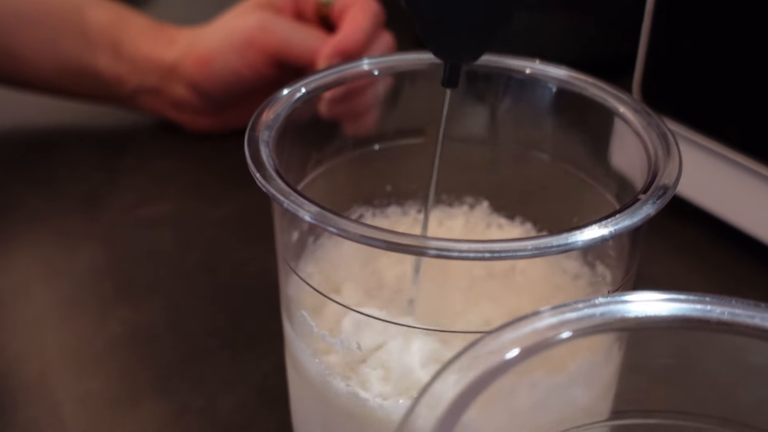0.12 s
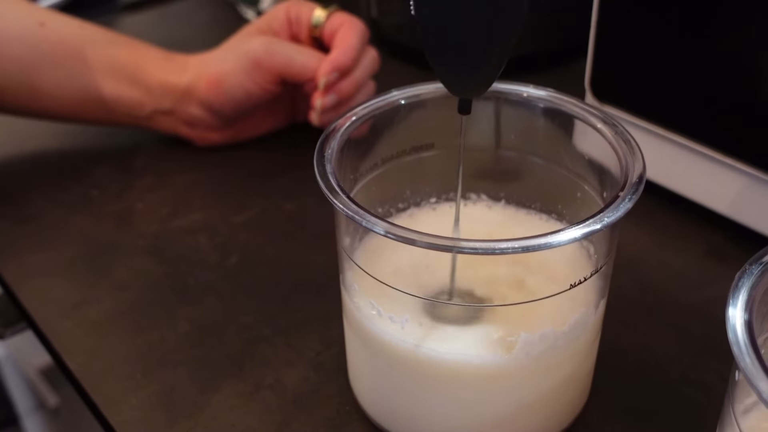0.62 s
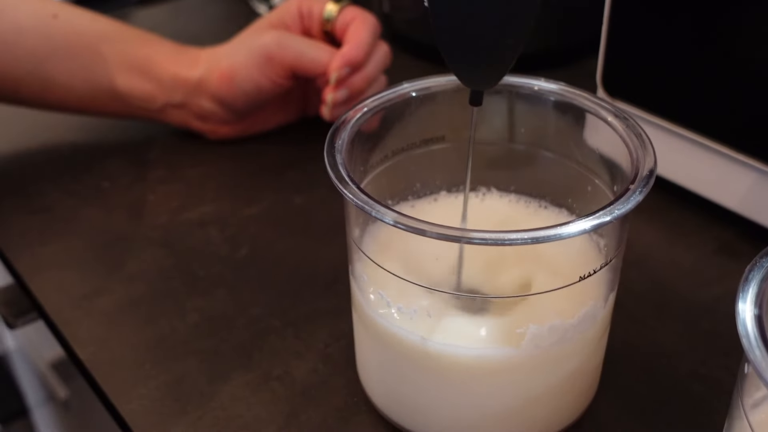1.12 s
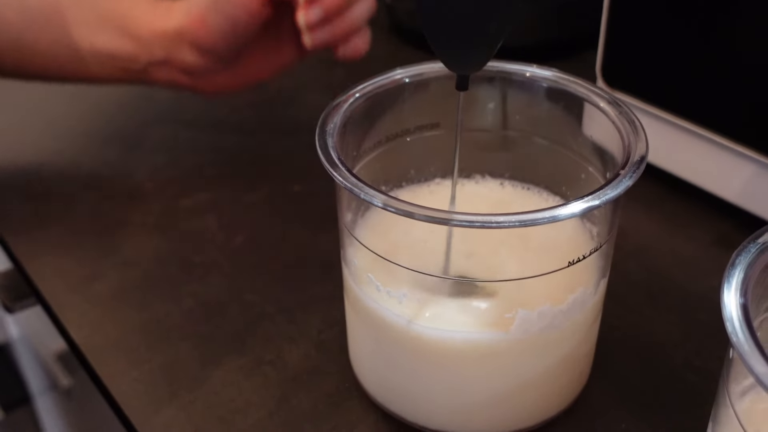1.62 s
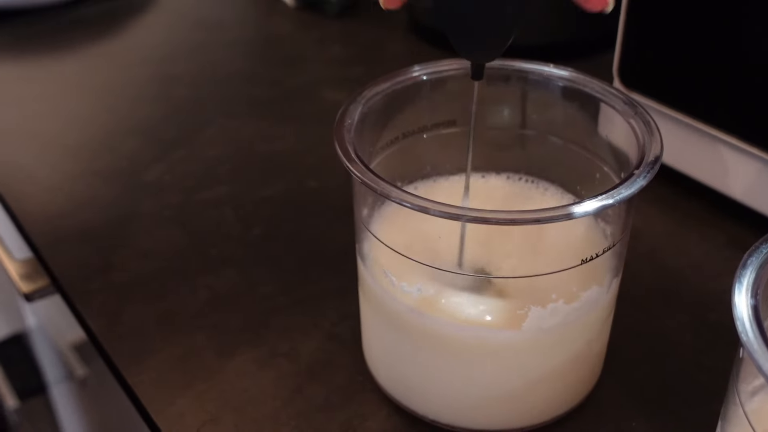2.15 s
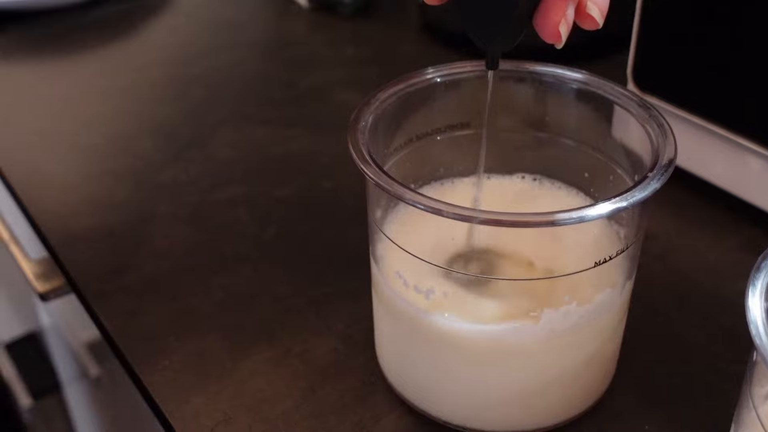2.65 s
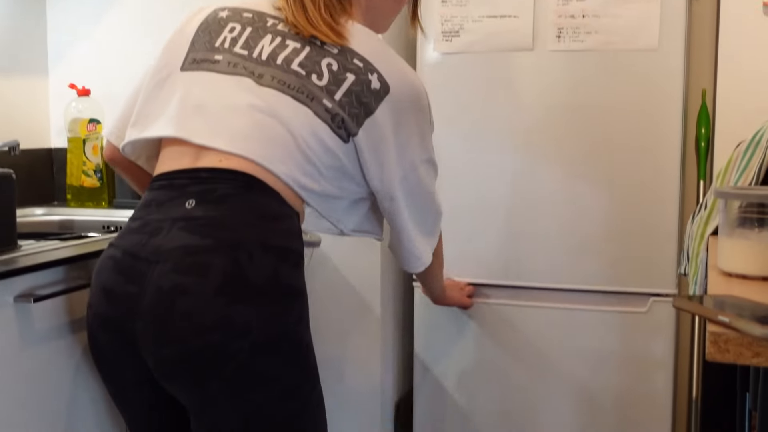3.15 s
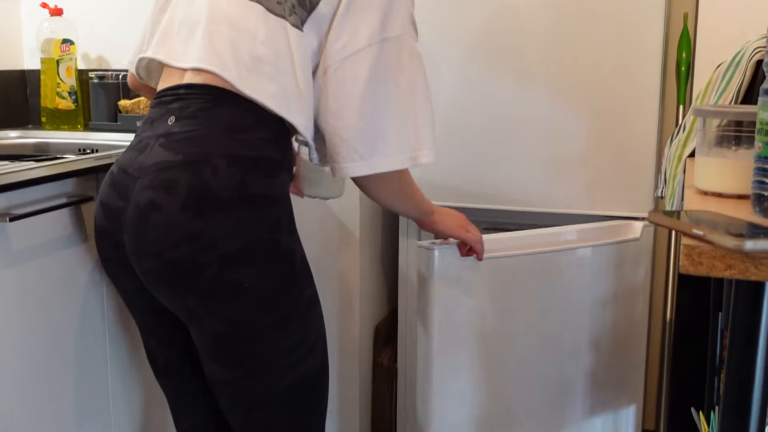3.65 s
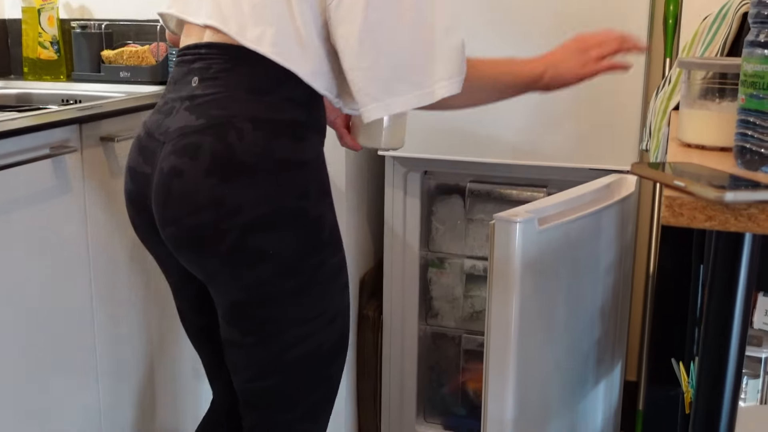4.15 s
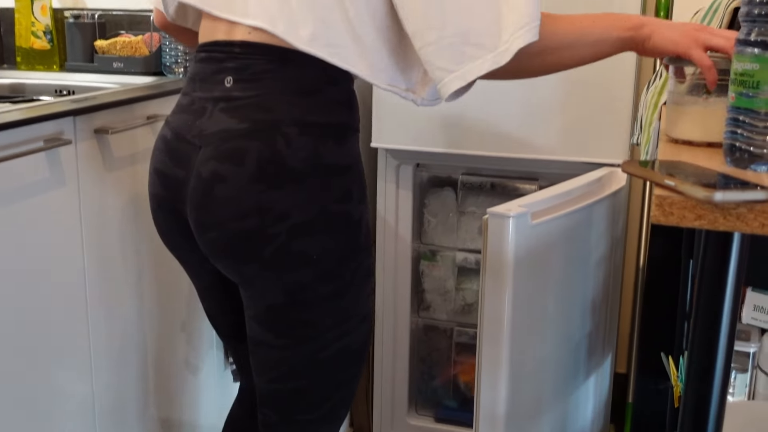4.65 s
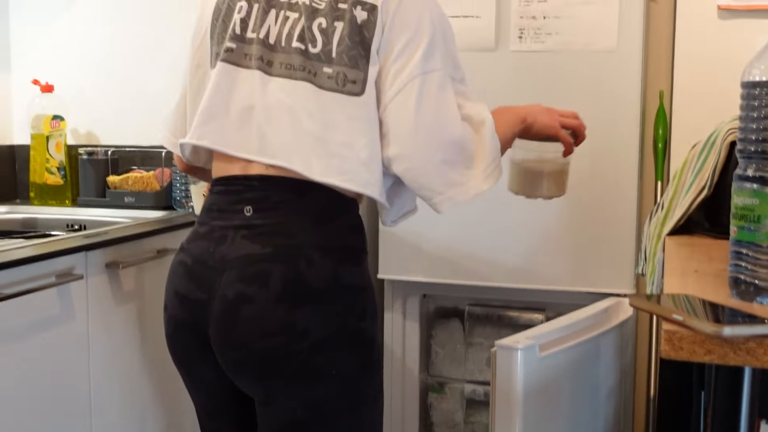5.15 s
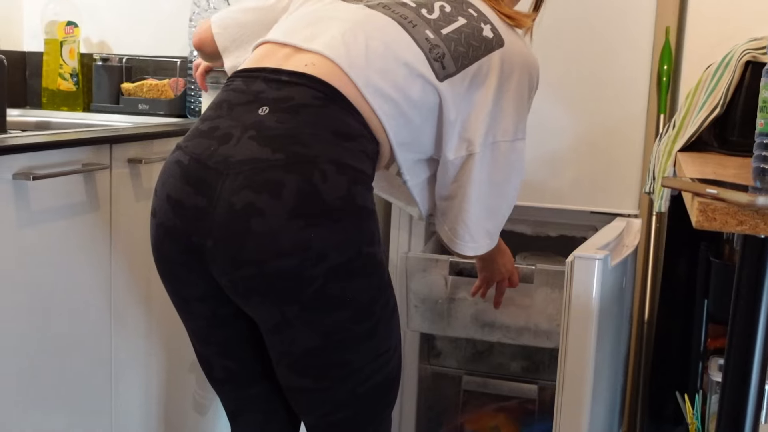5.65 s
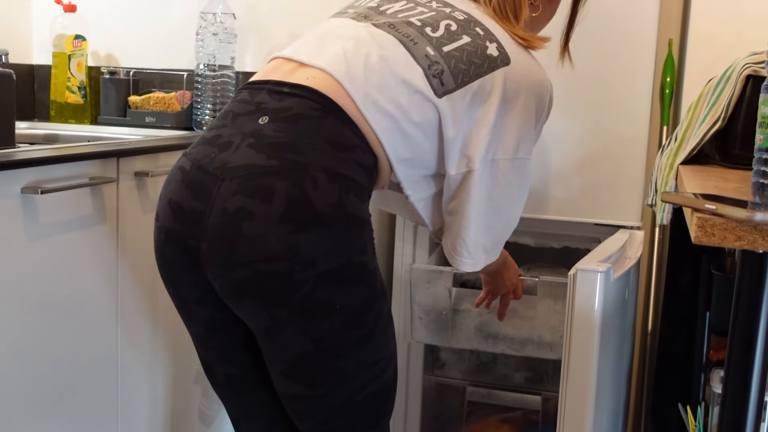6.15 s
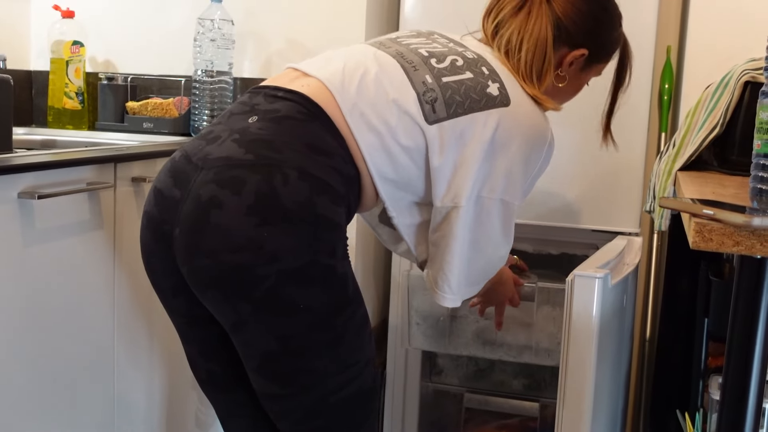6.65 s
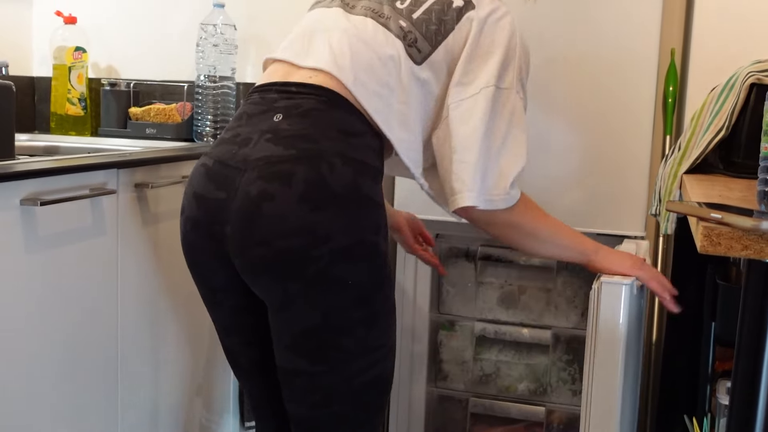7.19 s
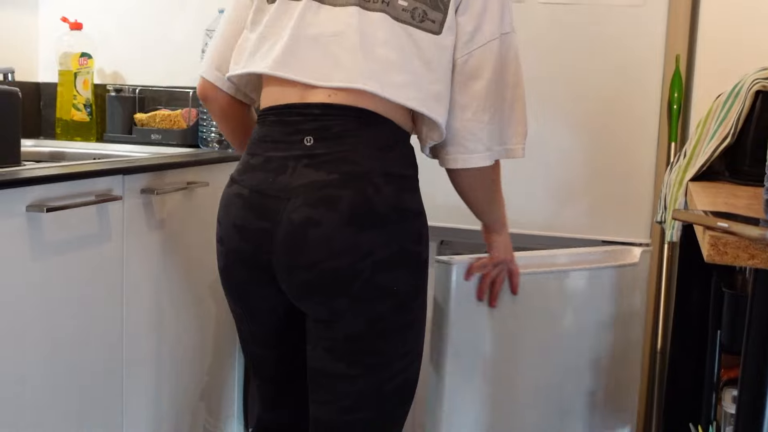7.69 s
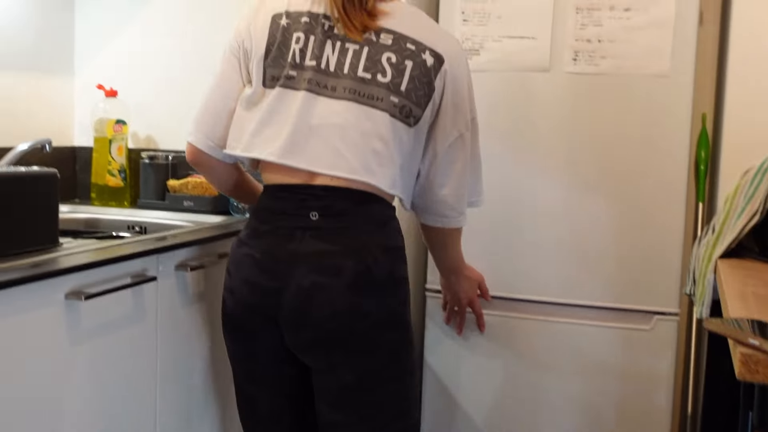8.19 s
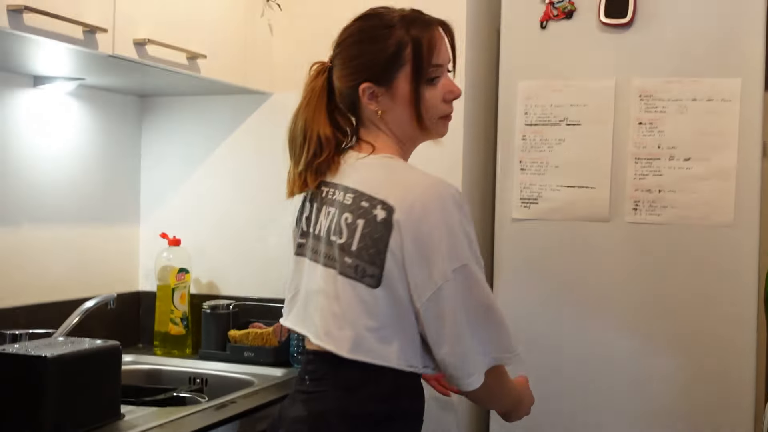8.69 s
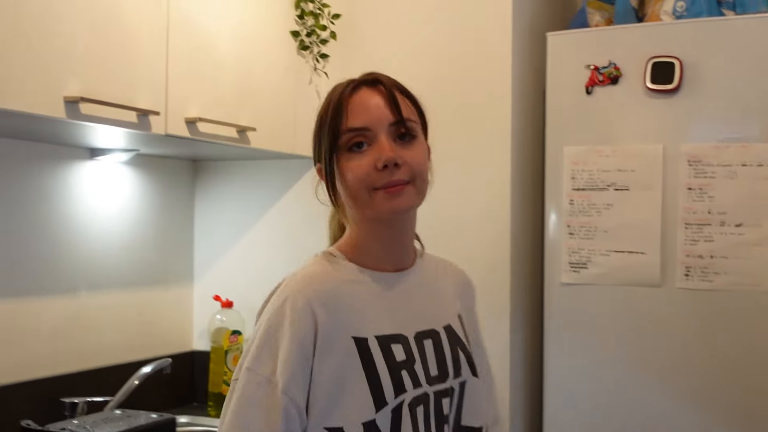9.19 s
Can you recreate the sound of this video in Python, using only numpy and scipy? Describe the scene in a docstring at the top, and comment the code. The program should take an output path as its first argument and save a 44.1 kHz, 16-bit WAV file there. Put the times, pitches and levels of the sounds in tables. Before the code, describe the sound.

From 0 to 2.76 s a battery frother runs very close to a phone: high thin motor whine, rough buzz around 150 pulses a second, a quick wobbling flutter, wet foam hiss and irregular bubbly spits. The milk tub hums near 1 kHz; brighter spray surges around 0.6 s and near the end. It cuts off abruptly to a freezer a few steps away, over low compressor hum and faint whine. Light taps, then a seal knock and short squeak at 2.9-3.3 s; near quiet until hollow tub knocks at 5.05-5.55 s. A drawer slides and rattles with bright frosty swishes at 6.55-7.0 s, with a small squeak and tick at 7.3 s. The door thumps shut at 8.15 s, shuddering and knocking until 8.6 s. Ticks at 8.55, 8.82 and 9.02 s sit over louder hum and cloth rustle to 9.3 s. Short hard-room reverberation.

```python
"""First a battery frother whirs in a plastic tub of milk close to a phone: the brushes hiss at each contact,
froth spits and the tub hums, while a kitchen sounds softly underneath.
At 2.76 s the scene jumps to a freezer a few steps away: door seal, tubs and drawer knock, squeak and tick
in a hard kitchen, as bursts of noise ringing through panels and plastic. Under them run the compressor's
hum and whine, made of filtered noise and wavering tones, and the noisy rustle of clothes."""
import sys
import numpy as np
from scipy import signal
from scipy.fft import rfft, irfft, next_fast_len
from scipy.io import wavfile
from scipy.ndimage import uniform_filter1d, minimum_filter1d

SR = 44100
rng = np.random.default_rng(int(sys.argv[2]) if len(sys.argv) > 2 else 0)


def waveform_to_disk(signal):
    """Save audio, clipped to [-1, 1], as 16-bit WAV at the path in sys.argv[1]."""
    frames = np.transpose(np.atleast_2d(signal))
    scaled = np.clip(frames, -1, 1) * 32767
    samples = np.round(scaled).astype(np.int16)
    wavfile.write(sys.argv[1], SR, samples)


def invert_db(x):
    """Field ratio 10**(x/20) for x, a level in decibels (scalar or array-like)."""
    u = np.asarray(x, float) / 20
    return 10 ** u


N = 410566  # samples, about 9.3 s
WHISK_END_S = 2.759

# resonances of the compressor hum: (pitch [Hz], width [Hz], level [dB])
HUM_MODES = [(156.5, 8.2, 6.5), (213.5, 17, 6.5), (264, 24, -8), (404, 21, -18.5)]
# tone colour of the room air: (frequency [Hz], gain [dB])
AIR_COLOUR = [(24, -77), (40, -69), (75, -55), (140, -12.5), (183, -5.5), (218, 4), (245, -6.5), (943, -13),
              (2080, -16), (4000, -34.5), (5200, -76.5), (8800, -120)]


def curve(table):
    """Draw each column of a table as a smooth line, one value per sample; the first column is time."""
    s, *columns = np.transpose(table)
    return [np.interp(np.arange(N) / SR, s, c) for c in columns]


def unit(x):
    """Scale to an average (rms) level of 1."""
    return x / np.sqrt(np.mean(x ** 2))


def colour(x, points):
    """Filter through (frequency [Hz], gain [dB]) points."""
    hz, db = np.transpose(points)
    size = next_fast_len(len(x), real=True)
    size += size % 2 * size  # an even length
    f = np.fft.rfftfreq(size, 1 / SR) + 1
    gain = invert_db(np.interp(np.log(f), np.log(hz), db))
    return irfft(rfft(x, size) * gain, size)[:len(x)]


def ring(x, hz, width):
    """Two-pole resonance, gain 1 at the centre."""
    return signal.lfilter(*signal.iirpeak(hz, hz / width, SR), x)


def steep(x, hz, width):
    """A resonance applied twice, so that little is left far from its centre."""
    return ring(ring(x, hz, width), hz, width)


def glide(x, hz, width):
    """Resonance whose centre follows a curve: shift down, smooth, shift back."""
    spin = np.exp(2j * np.pi * np.cumsum(hz) / SR)
    pole = np.exp(-np.pi * width / SR)
    return 2 * np.real(spin * signal.lfilter([1 - pole], [1, -pole], x / spin))


def rings(x, modes):
    """Sum of resonances (pitch [Hz], width [Hz], gain [dB])."""
    return sum(invert_db(db) * ring(x, hz, width) for hz, width, db in modes)


def walk(rate):
    """Smooth random wandering with about rate new values per second and a spread near 1."""
    k = int(SR / rate)
    held = np.repeat(rng.standard_normal(N // k + 1), k)
    return 1.47 * uniform_filter1d(uniform_filter1d(held, k), k)[:N]


def noise():
    """White noise."""
    return rng.standard_normal(N)


def blips(rows, cycles):
    """Short damped tones from (time [s], peak of the envelope [dB], pitch [Hz]) rows."""
    out = np.zeros(N + SR)
    for s, db, hz in rows:
        shape = np.arange(int(9 * cycles * SR / hz)) * hz / SR / cycles
        envelope = np.e * shape * np.exp(-shape)
        out[int(s * SR):][:len(shape)] += invert_db(db) * envelope * np.sin(2 * np.pi * cycles * shape)
    return out[:N]


def whisk(rate):
    """Turn the rotor: count its brush contacts, swing the whisk every third turn, snap at each contact."""
    contact = np.cumsum(rate * (1 + 0.0064 * walk(30))) / SR
    contact -= contact[int(2.63 * SR)]  # a moment when the whisk swings out furthest
    # two contacts make a turn, so six make three turns
    wobble = invert_db(6.3 * (.5 + .5 * np.cos(2 * np.pi * contact / 6)) ** 5)
    # each contact is a snap of its own size and sign over a little sliding hiss
    snap = np.r_[0, np.diff(np.floor(contact))] * np.sign(noise()) * invert_db(2.2 * noise())
    spark = (snap + .028 * noise()) * wobble ** .25
    return contact, wobble, spark


def motor(contact, spark, spray_db):
    """Brush snaps ring at two high pitches; noise pulsing once a turn rings in the case and the shaft."""
    t = np.arange(N) / SR
    opening_s, opening_fade_s, spin_up_s = 0.24, .012, .13
    # 1 during the opening, then quickly 0
    opening = 1 / (1 + np.exp(np.clip((t - opening_s) / opening_fade_s, -30, 30)))
    start = np.exp(-(t / spin_up_s) ** 2)
    turn = (0.5 + np.exp(-(contact / 2 % 1) / 0.15)) * noise()
    # the upper ring is faint during the opening; later it and the case slowly grow fainter
    upper_db = -44.5 - 14 * opening - 1.2 * t
    # at switch-on the case sings louder and a little lower
    case_db = -41 - 2.0 * t + 6.5 * start
    case_hz = 5520 - 63 * start + 12 * walk(2)
    # the shaft is louder in the opening, and buzzes more when the whisk breaks the surface and sprays
    shaft_db = -45 + 3 * opening + 0.23 * (spray_db + 53.5)
    parts = [(-44, steep(spark, 10000, 520)), (upper_db, steep(spark, 11130, 380)),
             (case_db, glide(turn, case_hz, 55)), (shaft_db, ring(turn, 3140, 50))]
    # each ring wavers a little on its own
    return sum(invert_db(db + .9 * walk(18)) * unit(part) for db, part in parts)


def churning(contact, wobble):
    """Stir the milk: noise and bursting bubbles swell with the wobble and jolt at each brush contact."""
    # many small bubbles and a few large, pitch spread over 2.6 octaves: (time [s], level [dB], pitch [Hz])
    draw = rng.random((9000, 3))
    bubbles = np.c_[WHISK_END_S * draw[:, 0], -3.2 * np.log(draw[:, 1] + .02), 2200 * 2 ** (2.6 * draw[:, 2])]
    fizz = unit(blips(bubbles, 1.8)[:int(WHISK_END_S * SR)])
    churn = wobble * invert_db(2.1 * walk(23.9)) * noise()
    churn[:len(fizz)] += 0.82 * fizz
    # the jolt fades over about this share of a contact; every second contact jolts harder
    jolt_db, jolt_share = 5, .3
    jolt = np.exp(-(contact % 1) / jolt_share) + .5 * np.exp(-(contact / 2 % 1) / jolt_share)
    return churn * invert_db(jolt_db * jolt)


def froth(churn, froth_db):
    """Colour the churning broadly and let it ring in patches of foam."""
    # tone colour of the froth: (frequency [Hz], gain [dB])
    froth_colour = [(180, -42), (300, -6.5), (713, -42.5), (994, -12), (1360, -6), (1840, -4.5), (2340, -9),
                    (2600, 0.5), (3400, -0.5), (5610, 3.5), (6600, 0), (7150, -6), (7800, -2.5),
                    (8900, -3.5), (10000, 4.5), (10600, -3), (12500, -10), (16000, -10.5)]
    # patches of foam: (pitch [Hz], width [Hz], level [dB])
    patches = [(2560, 90, -3), (3330, 150, -5), (3560, 99, -4), (4130, 90, 8.5), (4405, 64, 1),
               (4950, 110, -1), (5240, 68, -10), (6680, 190, -2.5), (7500, 230, 2), (9550, 130, -11.5)]
    body = unit(colour(churn, froth_colour))
    # each patch swells and fades on its own
    foam = sum(invert_db(db + 2.0 * walk(13.97)) * glide(churn, hz * (1 + 0.013 * walk(4.86)), width)
               for hz, width, db in patches)
    return invert_db(froth_db) * (body + 0.32 * unit(foam))


def spray(churn, wobble, spark, spray_db):
    """Bright hiss of drops, with churning at the surface and drops flung on each swing."""
    # tone colour of the spray: (frequency [Hz], gain [dB])
    spray_colour = [(3000, -48), (6000, 8), (9000, 5), (13000, 5), (16000, 3)]
    t = np.arange(N) / SR
    hiss = invert_db(spray_db + 1.13 * walk(9.9)) * unit(colour(churn + 3 * spark, spray_colour))
    surge = invert_db(-6.5) * unit(steep(churn, 3300, 1000))
    # more drops fly, by 4 dB each second, as the whisk works up to the surface
    thrown = invert_db(4 * t) * wobble ** 3 * churn
    fling = invert_db(-6) * unit(steep(thrown, 14200, 3200))
    return hiss + invert_db(spray_db) * (surge + fling)


def tub(churn, low_db, upper_db):
    """Sloshing milk makes the tub hum at notes that sink as foam builds."""
    # low notes of the tub: (multiple of the tub's pitch, width [Hz], level [dB])
    low_notes = [(.48, 93, -12), (.9, 59.5, -9.5), (0.999, 64, 5)]
    t = np.arange(N) / SR
    slosh = noise() + 0.72 * churn
    tub_hz = 1026 - 25.6 * t + 12 * walk(6.4)
    low = sum(invert_db(db + 1.0 * walk(22)) * glide(slosh, k * tub_hz, width) for k, width, db in low_notes)
    upper_gain = invert_db(upper_db + 2.5 * walk(22))
    upper_hz = 1885 * (1 - 0.0067 * t + 0.004 * walk(4.9))
    return invert_db(low_db) * unit(low) + upper_gain * unit(glide(slosh, upper_hz, 93))


def spits():
    """Each loud bubble bursts with a blip and a short spray of droplets around its pitch."""
    # loud spits of froth: (time [s], peak of the blip's envelope [dB], pitch [Hz])
    bursts = [(0.033, -27, 5700), (.054, -19, 5800), (.123, -29, 1630), (0.144, -32, 1580),
              (.177, -28.5, 2060), (.514, -22.5, 1790), (0.564, -16.5, 3250), (0.683, -12, 3560),
              (.798, -17, 3330), (.7, -23, 9100), (.753, -21, 8700), (.823, -17, 6970),
              (0.857, -27.5, 8500), (.947, -16.5, 6500), (.988, -20, 6300), (1.433, -20, 6600),
              (2.065, -21, 3080), (2.709, -16, 6000), (0.865, -13.5, 3560), (.896, -23, 980),
              (.897, -35, 490), (1.047, -17, 3730), (1.091, -27, 4193), (1.216, -12, 5360),
              (1.304, -14.5, 2430), (1.539, -22, 1840), (1.755, -20, 3280), (1.813, -20, 6050),
              (1.853, -26, 4000), (1.899, -24, 4000), (1.911, -17, 5900), (1.915, -17, 6200),
              (1.948, -18, 6300), (1.9785, -13.5, 4200), (1.978, -21, 2850), (1.991, -32, 1090),
              (2.022, -27, 3600), (1.9787, -25, 5760), (2.111, -15, 3000), (2.1113, -23, 4800),
              (2.164, -19.5, 4500), (2.166, -23, 5900), (2.381, -31.5, 1290), (2.503, -22, 3570),
              (2.518, -20, 4500), (2.563, -17, 3270), (2.593, -16.5, 3280), (2.626, -18, 3300),
              (2.717, -25, 5500), (2.588, -20, 3130), (2.597, -19.5, 1880), (2.597, -31.5, 456),
              (2.694, -19, 7900), (2.733, -18.5, 3500)]
    out = blips(bursts, 1.01)
    t = np.arange(2205) / SR
    splash_db, splash_s = -10, 0.005  # droplets, set against the blip
    for (s, db, hz), drops in zip(bursts, rng.standard_normal((len(bursts), len(t)))):
        splash = np.exp(-t / splash_s) * unit(steep(drops, hz, 0.38 * hz))
        out[int(s * SR):][:len(t)] += invert_db(db + splash_db) * splash
    return out


def frother():
    """The turning whisk drives motor, froth, spray and tub; loud spits are laid on top."""
    # (time [s], brush contacts [per s], froth [dB], spray [dB], tub's low note [dB], tub's upper note [dB])
    whisk_course = [(0, 165, -44, -56, -69, -46.5), (.22, 150, -48.5, -55, -66, -59),
                    (.4, 140, -37.5, -59, -57, -48), (.58, 152, -35.5, -39, -51.5, -49.5),
                    (.9, 152, -32.5, -55, -44, -42.5), (1.15, 150, -35.5, -54, -49.5, -46),
                    (1.4, 142, -36, -61, -42.5, -46), (1.65, 155, -34.5, -50, -53.5, -49.5),
                    (2.0, 138, -35, -68, -50, -52.5), (2.25, 137, -37.5, -43, -43, -42.5),
                    (2.39, 137, -36.5, -53, -48, -48), (2.46, 149, -40.5, -38.5, -58, -44.5),
                    (2.62, 155, -39.5, -39, -52, -49), (2.76, 174, -37.5, -37, -50, -52)]
    rate, froth_db, spray_db, low_db, upper_db = curve(whisk_course)
    contact, wobble, spark = whisk(rate)
    whir = motor(contact, spark, spray_db)
    churn = churning(contact, wobble)
    milk = froth(churn, froth_db) + spray(churn, wobble, spark, spray_db)
    return whir + milk + tub(churn, low_db, upper_db) + spits()


def echo(x):
    """Diffuse kitchen tail: bands of noise that each die away at their own speed."""
    # how long each band rings: (band centre [Hz], time to fall by 60 dB [s])
    room = [(100, 0.66), (300, 0.44), (1000, 0.51), (3000, 0.081), (8000, 0.067), (14000, 0.61)]
    t = np.arange(SR // 2) / SR
    tail = sum(ring(rng.standard_normal(len(t)), hz, hz) * invert_db(-60 * t / t60) for hz, t60 in room)
    tail *= np.minimum(t / 0.0051, 1)
    return signal.fftconvolve(x, tail / np.sqrt(np.sum(tail ** 2)))[:N]


def compressor_whine():
    """Steady tones whose level and phase waver."""
    # (pitch [Hz], level [dB])
    whine_tones = [(1960, -1), (2008, 1), (2056, 0), (2104, -13)]
    t = np.arange(N) / SR
    return sum(invert_db(db + 2.5 * walk(25) + 2 * walk(4)) * np.sin(2 * np.pi * hz * t + 1.1 * walk(30))
               for hz, db in whine_tones)


def thin_tones():
    """Faint breathy high tones: narrow bands of noise."""
    # (pitch [Hz], width [Hz], level [dB])
    breathy_bands = [(5900, 59, -81), (5130, 70, -85), (14890, 60, -96)]
    # their common rise and fall: (time [s], level [dB])
    thin_course = [(2.7, -8), (3.3, 0), (5.2, 0), (5.6, 13), (6.5, 13), (7.2, 6), (8, -1), (9.31, 10)]
    thin = sum(invert_db(db + 4 * walk(10)) * unit(ring(noise(), hz, width)) for hz, width, db in breathy_bands)
    return invert_db(curve(thin_course)[0]) * thin


def room_tone():
    """Compressor hum as noise in low resonances, with coloured noise for the room air."""
    hum = invert_db(-61.5 + 1.0 * walk(8.2)) * unit(rings(noise(), HUM_MODES))
    air = invert_db(-59.5) * unit(colour(noise(), AIR_COLOUR))
    return hum + air


def rustle(treble_db):
    """Soft treble noise with a few bright swishes of drawer frost and clothes."""
    # (start [s], length [s], level [dB])
    swishes = [(6.547, 0.08, -45), (6.6, 0.063, -27), (6.811, 0.15, -38.5), (7.18, 0.086, -55.5),
               (8.455, 0.16, -44.5), (7.295, 0.043, -63.5)]
    # tone colour of the rustle: (frequency [Hz], gain [dB])
    rustle_colour = [(1500, 9), (3000, 10), (5000, 7), (8000, 4.5), (12000, 2), (16000, 3.5)]
    t = np.arange(N) / SR
    rise_s, fall_s = 0.01, 0.042
    swish = sum(invert_db(db) * np.clip((t - s) / rise_s, 0, 1) * np.exp(-np.maximum(t - s - length_s, 0) / fall_s)
                for s, length_s, db in swishes)
    return (invert_db(treble_db) + swish) * invert_db(0.76 * walk(49)) * unit(colour(noise(), rustle_colour))


def kitchen():
    """Compressor hum and whine, room air, thin high tones and rustle, each with its own course."""
    # (time [s], lift of the room tone [dB], level of the steady rustle [dB], lift of the whine [dB])
    kitchen_course = [(2.7, 1.5, -99, -78), (2.8, -0.5, -62, -67), (2.97, -4, -55.5, -67),
                      (3.3, 14.5, -53.5, -65), (3.55, 1.5, -58, -65), (3.8, 1, -61.5, -70),
                      (4.05, 0.5, -62, -65), (4.4, -0.5, -64, -72), (4.95, 0.5, -61.5, -65),
                      (5.3, 3, -64, -74), (5.6, 6, -56.5, -76), (5.73, 11.5, -55, -62), (6.2, 7, -55, -65),
                      (6.58, 10.5, -53, -70), (7.15, 10, -57, -72), (7.45, 2, -55, -70),
                      (7.95, -0.5, -60.5, -68), (8.38, 14, -63, -60), (8.5, 21, -49, -49),
                      (8.8, 16.5, -45.5, -52), (9.31, 11.5, -46.5, -53)]
    room_db, treble_db, whine_db = curve(kitchen_course)
    whine = invert_db(whine_db) * compressor_whine()
    thin = thin_tones()
    return invert_db(room_db) * room_tone() + thin + whine + rustle(treble_db)


def struck(body, share, draws):
    """Turn fall times into widths and detune the modes: each blow lands on a differently held body."""
    return [(hz * (1 + share * z), np.log(1000) / np.pi / t60, db) for (hz, db, t60), z in zip(body, draws)]


def knocks():
    """Each blow pushes, rattles and drives the panels, the plastic and a bright crack; contents shudder on."""
    # (time [s], thud drive [dB], favoured thud pitch [Hz], clack [dB over the thud drive],
    #  favoured clack pitch [Hz], crack [dB over the thud drive])
    blows = [(2.857, -45, 213, -9, 1200, -3), (3.039, -57.5, 205, -13, 1210, 12.5),
             (3.117, -46, 234, -1, 1200, 2.5), (3.254, -25, 345, -1, 1440, -14),
             (3.258, -33, 205, 0, 1840, -22), (5.066, -23.5, 255, -8.5, 1300, -23.5),
             (5.078, -16, 252, -16.5, 1100, -44), (5.107, -16.5, 208, -39, 900, -50),
             (5.125, -32, 460, -17, 900, -40), (5.159, -28.5, 387, -37, 900, -43),
             (5.217, -24.5, 201, -44, 900, -44), (5.361, -13, 350, 3.5, 1040, -18),
             (5.364, -25, 463, 10.5, 2680, -10), (5.378, -9.5, 205, -5, 1500, -27),
             (5.39, -15, 405, -11, 2300, -23), (5.414, -14.5, 470, 1, 855, -33),
             (5.425, -17, 503, -6, 2780, -29), (5.47, -23, 460, -6.5, 2900, -26),
             (5.444, -13.5, 220, -11, 1500, -37), (5.49, -23, 330, -4, 900, -30),
             (5.524, -32.5, 466, -3, 1400, -29), (5.554, -18.5, 204, -41, 900, -43),
             (6.231, -46, 214, 10, 2300, 0), (6.606, -21, 264, -5.5, 1900, 4),
             (6.619, -20, 264, -3.5, 1600, 7), (6.645, -18, 272, -8.5, 1500, -18),
             (6.665, -19, 296, -5, 2200, -17), (6.695, -23.5, 277, -7, 1500, -10),
             (6.722, -21.5, 275, -0.5, 2400, -10), (6.811, -40, 258, 11, 1300, 1),
             (6.836, -26, 264, 2, 1250, 5.5), (6.848, -18, 274, -12, 1250, 0),
             (6.865, -18.5, 265, -14, 1200, -12), (6.888, -16, 282, -16, 1240, -14),
             (6.924, -23, 276, -2, 2100, 4.5), (6.955, -30.5, 295, 1.5, 2070, -15),
             (7.005, -26, 323, 0, 2080, -5), (7.298, -40, 304, -9, 1600, -4),
             (8.048, -56, 288, -5, 2000, 0), (8.065, -50, 288, -1, 1900, -2),
             (8.149, -36, 300, 12, 1310, 1), (8.157, -9.5, 188, -2.5, 1800, -9.5),
             (8.169, -12, 140, -40, 900, -41), (8.185, -21, 447, 2.5, 1200, -8),
             (8.212, -14.5, 244, -0.5, 1920, -9.5), (8.236, -18, 337, -1.5, 900, -15),
             (8.287, -19.5, 173, -2, 900, -31), (8.456, -28.5, 198.6, 1.5, 1000, -7.5),
             (8.478, -19.5, 205, -25, 900, -34), (8.549, -30, 219, 3, 1100, -1),
             (8.58, -23, 280, 1.5, 1280, -6.5), (8.625, -24.5, 261, -4, 1100, -4.5)]
    # modes of cabinet and drawer: (pitch [Hz], gain [dB], time to fall by 60 dB [s])
    panel_modes = [(144.3, -11, 0.52), (184.5, -4.5, 0.37), (205, 1.5, 0.22), (259.5, 1, 0.15),
                   (280, -2, 0.51), (298, 3.5, 0.093), (349.2, 2, 0.13), (386, 2, 0.079), (463, 7, 0.11),
                   (502, 5.5, 0.065), (542, -6, 0.32)]
    # higher, shorter modes of the plastic: (pitch [Hz], gain [dB], time to fall by 60 dB [s])
    plastic_modes = [(686, -1.5, 0.024), (760, -5.5, 0.054), (830, -0.5, 0.043), (900, 2, 0.033),
                     (1044, -1.5, 0.029), (1174, -4.5, 0.014), (1290, -3, 0.028), (1497, 0, 0.032),
                     (1573, -9, 0.042), (1750, -0.5, 0.01), (2007, -4.5, 0.023), (2100, -7.5, 0.015),
                     (2302, -5, 0.016), (2660, -0.5, 0.058), (3000, -8.5, 0.036), (3250, -31, 0.044)]
    thud, clack, crack, shudder = np.zeros((4, N + 22050))
    t = np.arange(22050) / SR
    rattle_s, rattle_rise_s, push_s, shudder_s, shudder_rise_s = 0.027, 0.0018, 0.002, 0.044, 0.064
    rattle = np.exp(-t / rattle_s) * np.minimum(t / rattle_rise_s, 1)
    push = invert_db(1) * t / push_s * np.exp(1 - t / push_s)  # the first solid push of a blow
    after = np.exp(-t / shudder_s) * (1 - np.exp(-t / shudder_rise_s))
    shakes = rng.standard_normal((len(blows), 4, len(t)))
    for (s, db, hz, clack_db, clack_hz, crack_db), shake in zip(blows, shakes):
        at = slice(int(s * SR), int(s * SR) + len(t))
        panel = struck(panel_modes, .008, shake[-1])
        plastic = struck(plastic_modes, .016, shake[-1])
        # where it is struck decides which modes ring most
        blow = invert_db(db) * (0.7 * rattle * shake[0] + push)
        thud[at] += rings(steep(blow, hz, 0.61 * hz), panel)
        clatter = invert_db(db + clack_db) * rattle * shake[1]
        clack[at] += rings(ring(clatter, clack_hz, 0.87 * clack_hz), plastic)
        crack[at] += invert_db(db + crack_db) * rattle * shake[2]
        shudder[at] += (invert_db(db) * after) ** 2  # overlapping shudders add as power
    thud = colour(thud, [(60, -23), (150, -1.5), (600, 2.0)])
    clack = colour(clack, [(300, 28), (650, 1.5), (3000, -3.5), (6000, 2.5), (16000, -60)])
    crack = colour(crack, [(600, -2.5), (1500, -2.0), (3000, -4.0), (8000, -10.5), (16000, -20.5)])
    out = invert_db(17.0) * thud + invert_db(9.5) * clack + invert_db(5.5) * crack
    # shelves and contents shake on after a blow
    loose = invert_db(-16.5) * unit(colour(noise(), AIR_COLOUR)) + invert_db(-14) * unit(rings(noise(), HUM_MODES))
    return out[:N] + np.sqrt(shudder[:N]) * loose


def squeaks():
    """Rubber, plastic and cloth slipping: swells of noise in resonances give squeaks, scrapes, short rings."""
    # (time of the middle [s], half length [s], pitch [Hz], width [Hz], level [dB])
    slips = [(3.219, 0.012, 2660, 820, -42.5), (3.236, 0.018, 1510, 453.6, -38.5),
             (5.51, .05, 14400, 600, -60), (7.3, 0.012, 2400, 110, -50), (7.2, 0.025, 1380, 200, -65),
             (6.845, 0.0088, 4350, 270, -35), (6.63, .02, 5900, 200, -33), (8.1, 0.046, 1800, 1300, -50),
             (4.059, 0.018, 7900, 9400, -56), (5.318, 0.039, 330, 260, -35), (5.335, .025, 850, 200, -53),
             (5.338, .025, 2670, 250, -57), (6.29, 0.051, 414, 60, -45.5), (6.572, 0.032, 3120, 70, -50),
             (6.595, .014, 1800, 3519, -42), (6.865, 0.031, 546, 55, -26), (6.955, 0.011, 2110, 270, -29),
             (7.327, 0.035, 1600, 830, -49), (8.57, 0.021, 1169, 456, -32), (5.333, 0.03, 1470, 260, -49.5),
             (9.092, 0.092, 5700, 7100, -40.5), (9.254, 0.04, 10500, 9700, -45.5)]
    out = np.zeros(N + SR)
    t = np.arange(-8820, 8820) / SR
    for (s, half_s, hz, width, db), slip in zip(slips, rng.standard_normal((len(slips), len(t)))):
        swell = np.exp(-np.abs(t / half_s) ** 3)
        out[int(s * SR) - len(t) // 2:][:len(t)] += invert_db(db) * swell * unit(steep(slip, hz, width))
    return out[:N]


def booms():
    """Air and floor thumps: low tones that die within a few cycles."""
    # (time [s], peak of the envelope [dB], pitch [Hz])
    thumps = [(5.069, -46, 50), (5.359, -42, 50), (5.554, -40, 44.8), (6.615, -31, 100), (6.85, -32, 111),
              (7.019, -37.5, 94), (8.157, -26, 45.3), (8.214, -30, 81), (8.24, -33, 110), (8.299, -45, 45),
              (8.455, -33, 40.3), (8.549, -42, 40), (8.619, -46, 40.3)]
    return blips(thumps, .75)


def ticks():
    """Dry ticks: higher tones that die within a few cycles."""
    # (time [s], peak of the envelope [dB], pitch [Hz])
    tick_rows = [(7.3, -37, 1600), (8.551, -20, 1300), (8.823, -17.5, 3320), (8.8235, -23, 1500),
                 (8.87, -35, 3800), (9.017, -24, 3220), (9.0175, -31.5, 1500)]
    return blips(tick_rows, .9)


def scene():
    """Near frother until the jump, then the freezer; close ports hear almost the same, so the side is weak."""
    # side colour of the frother's echo and the kitchen: (frequency [Hz], gain [dB])
    side_colour = [(60, -5), (200, -11), (500, -6), (1000, -10), (2500, -16), (5000, -15.5), (9000, -12.5),
                   (15000, -17.5)]
    # side colour of the freezer's echo: (frequency [Hz], gain [dB])
    knock_side_colour = [(60, -41), (250, -30), (600, -18.5), (1500, -14), (5000, -7.5), (12000, -14.5)]
    near = frother()
    far = knocks() + squeaks() + booms() + ticks()
    # the frother fades out within 4 ms
    running = np.clip((WHISK_END_S - np.arange(N) / SR) / .004, 0, 1)
    louder = invert_db(4.5 * running)  # the kitchen sounds louder beside the frother
    mid = running * (near + invert_db(-8.5) * echo(near)) + far + invert_db(-4.5) * echo(far) + louder * kitchen()
    # fresh noise in the side makes left and right differ
    side = colour(running * echo(near) + louder * kitchen(), side_colour)
    side += colour(echo(far), knock_side_colour)
    return mid + side * np.array([[1], [-1]])


def band_limit(x):
    """A steep low-pass at the top of the band."""
    return signal.sosfilt(signal.butter(12, 16850, fs=SR, output="sos"), x)


def record(dry):
    """The phone thins the bass, holds loud sounds down and cuts the top."""
    thin = signal.sosfilt(signal.butter(2, 70., "high", fs=SR, output="sos"), dry)
    # limiter: peak level over 25 ms, smoothed, turns the gain down above -5 dB
    peak = -minimum_filter1d(-np.abs(thin).max(axis=0), size=1101)
    smooth_peak = uniform_filter1d(peak, size=551) + 1e-9
    gain = np.minimum(invert_db(-5) / smooth_peak, 1) ** .7  # takes off 0.7 of the excess dB
    cut = signal.sosfilt(signal.ellip(8, .2, 70, 15900, fs=SR, output="sos"), gain * thin)
    return band_limit(cut)


dry = scene()
out = record(dry)
waveform_to_disk(out)
```